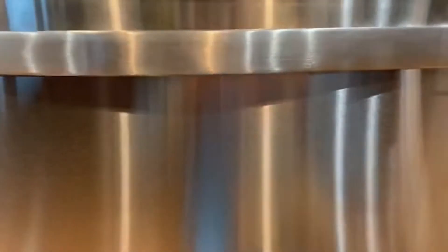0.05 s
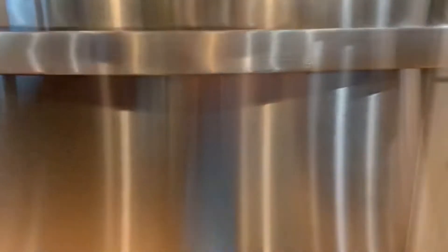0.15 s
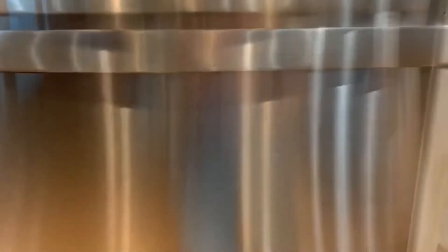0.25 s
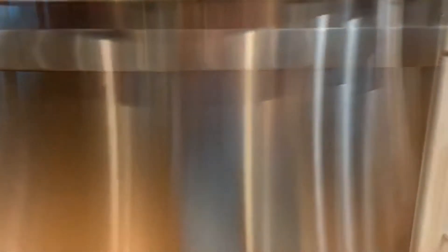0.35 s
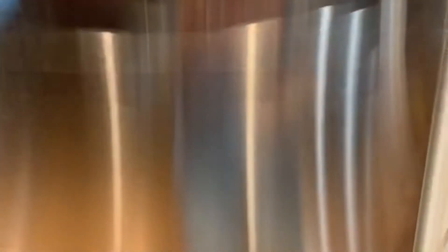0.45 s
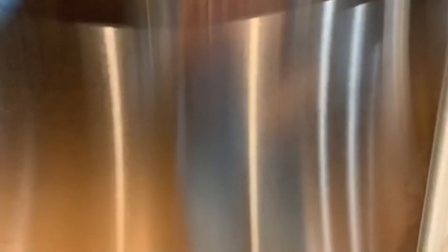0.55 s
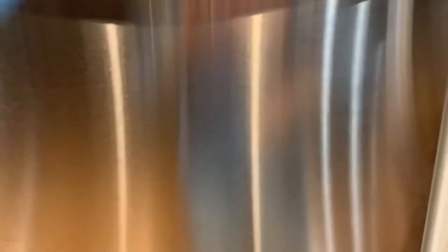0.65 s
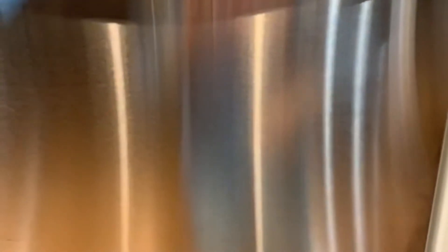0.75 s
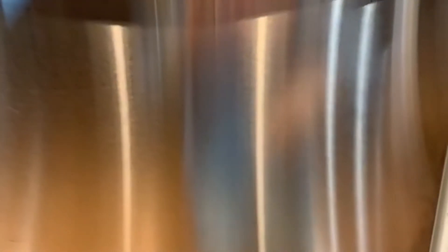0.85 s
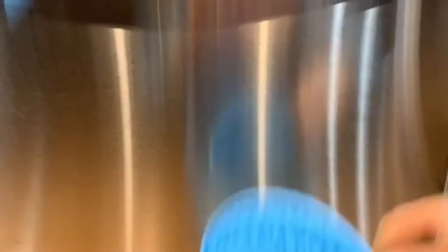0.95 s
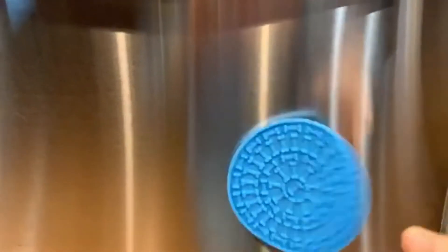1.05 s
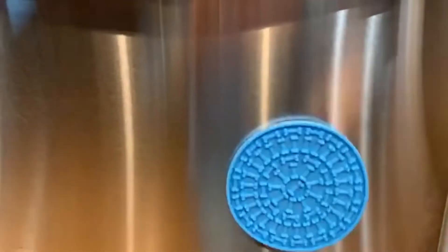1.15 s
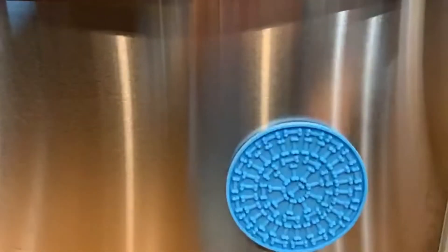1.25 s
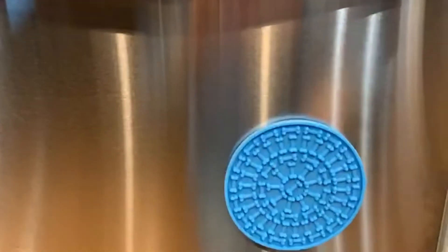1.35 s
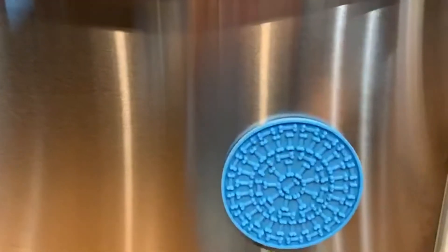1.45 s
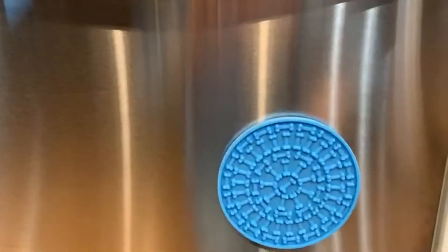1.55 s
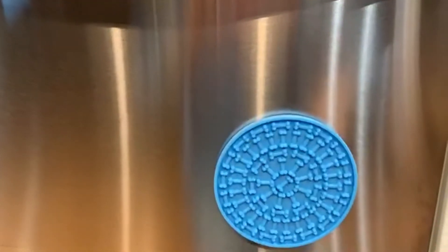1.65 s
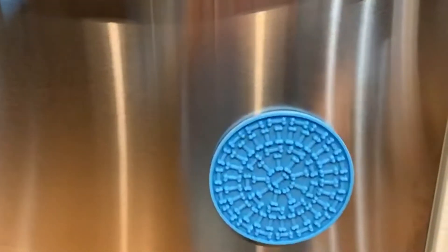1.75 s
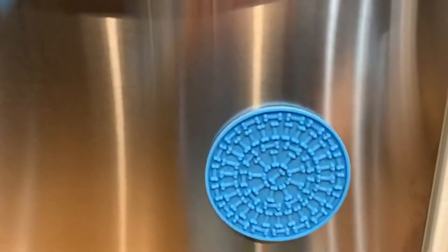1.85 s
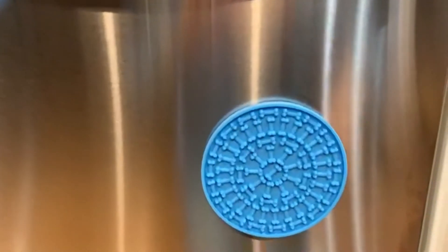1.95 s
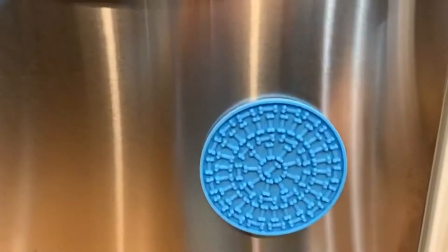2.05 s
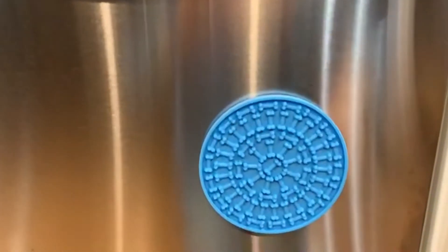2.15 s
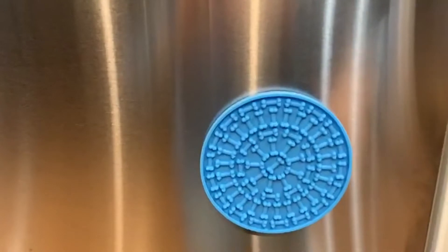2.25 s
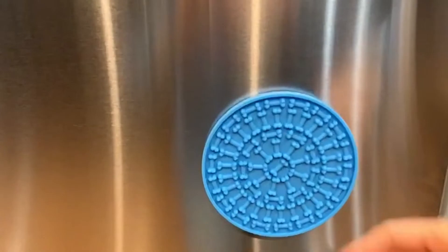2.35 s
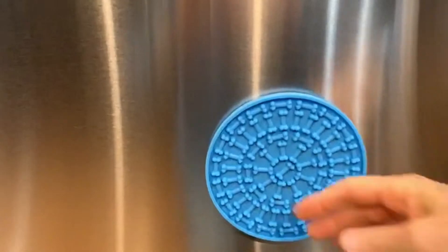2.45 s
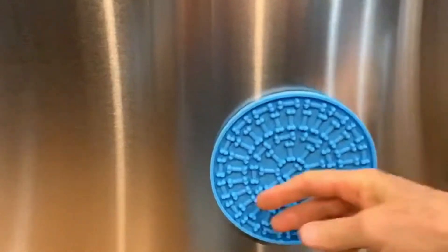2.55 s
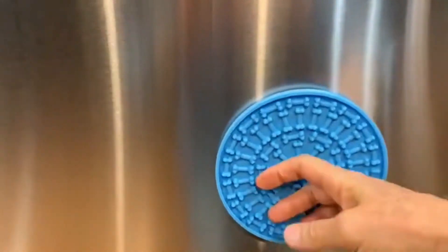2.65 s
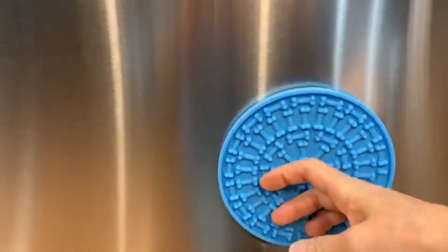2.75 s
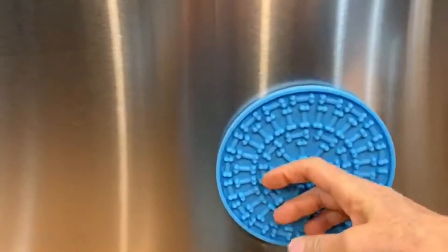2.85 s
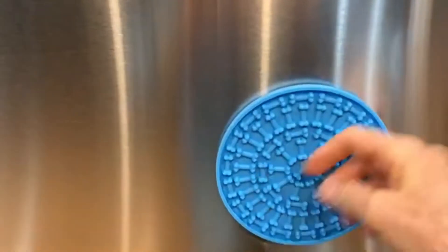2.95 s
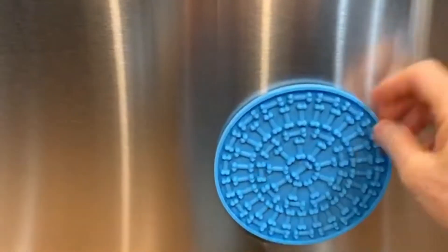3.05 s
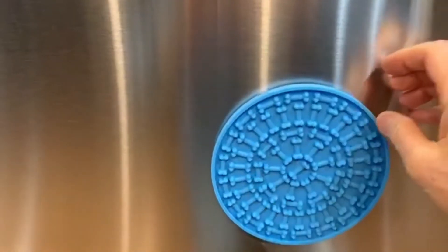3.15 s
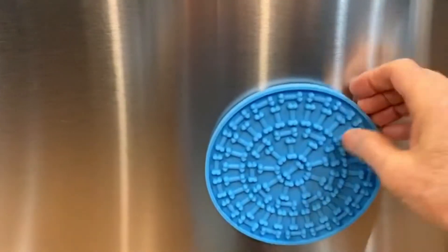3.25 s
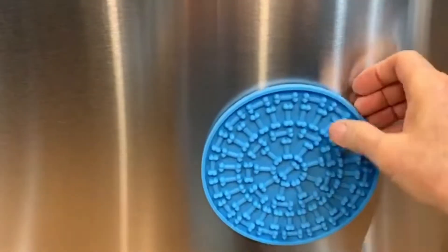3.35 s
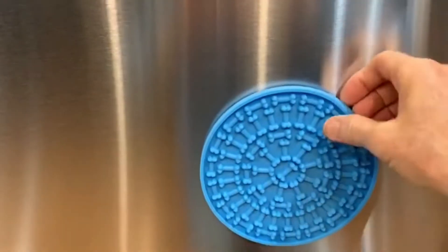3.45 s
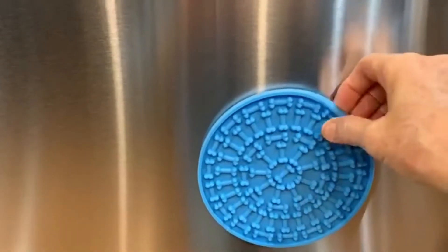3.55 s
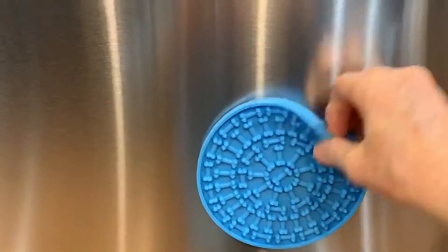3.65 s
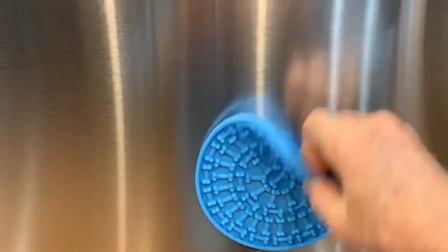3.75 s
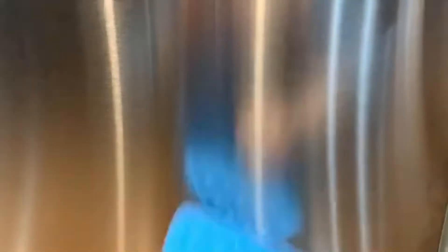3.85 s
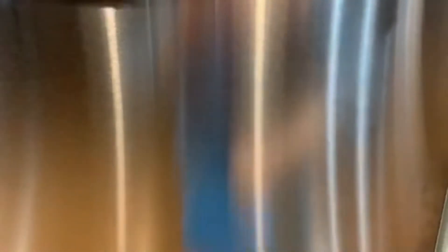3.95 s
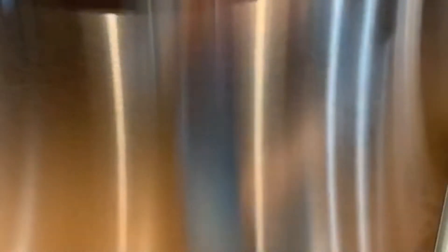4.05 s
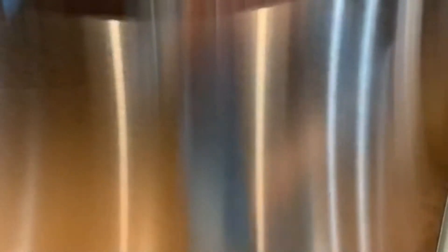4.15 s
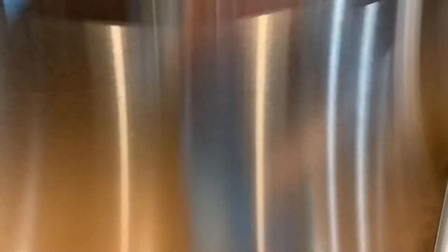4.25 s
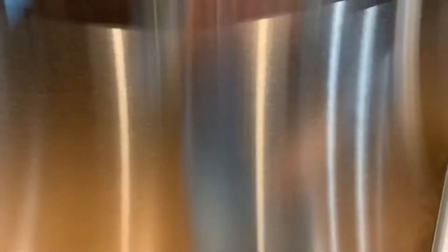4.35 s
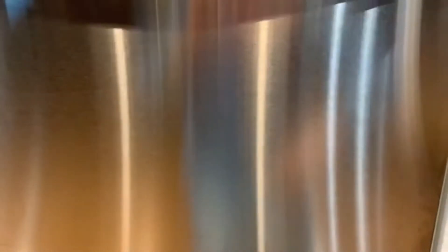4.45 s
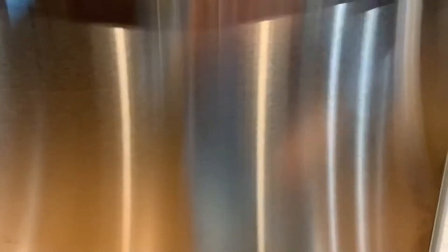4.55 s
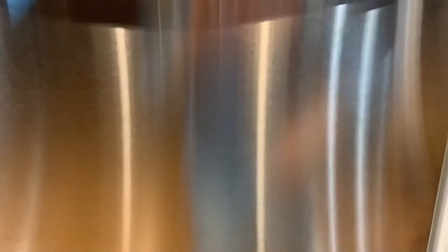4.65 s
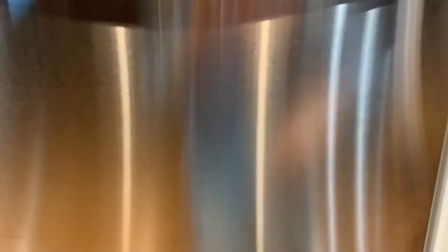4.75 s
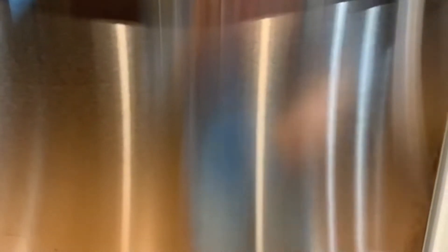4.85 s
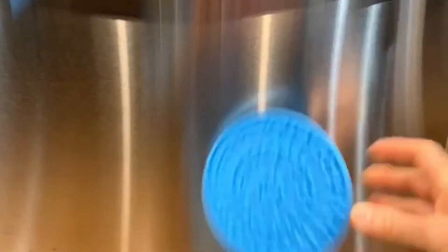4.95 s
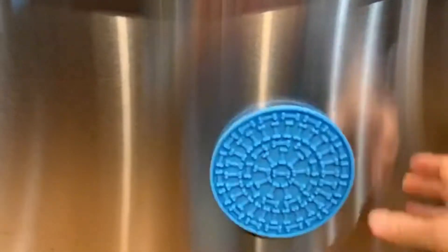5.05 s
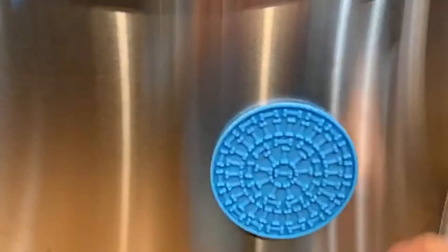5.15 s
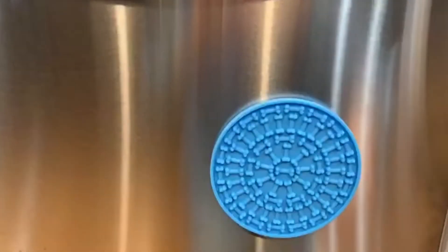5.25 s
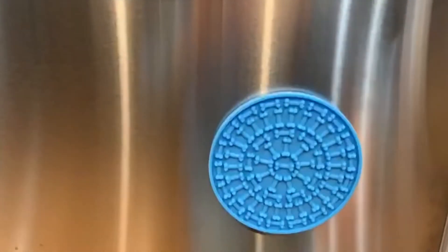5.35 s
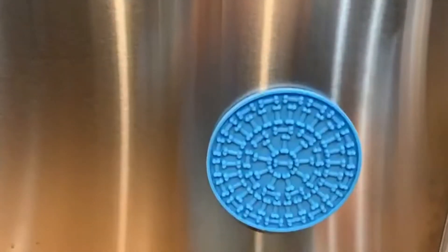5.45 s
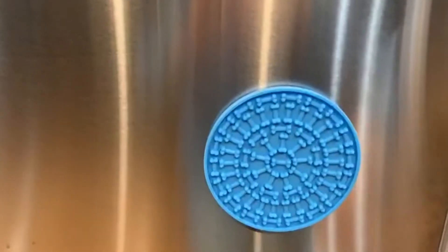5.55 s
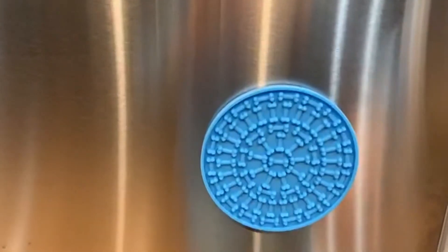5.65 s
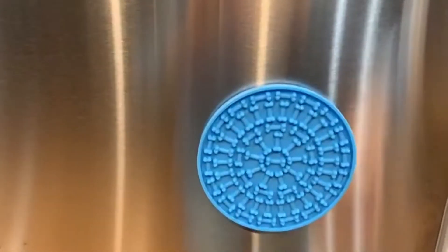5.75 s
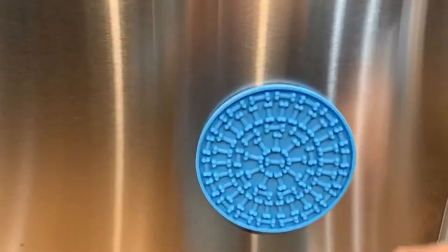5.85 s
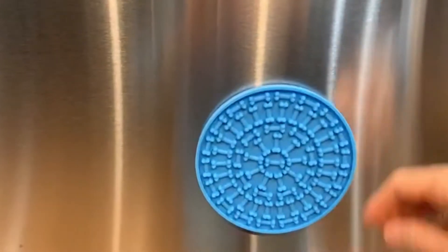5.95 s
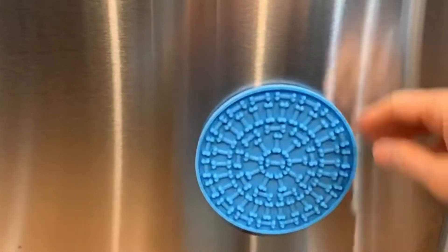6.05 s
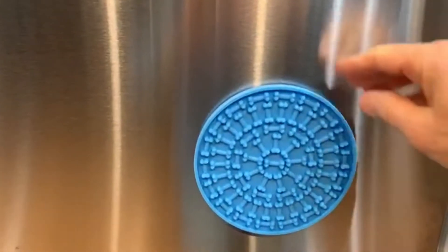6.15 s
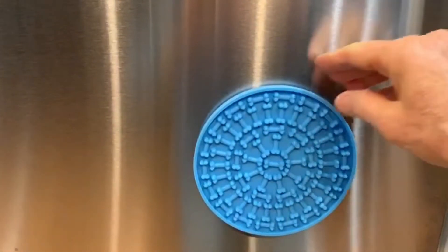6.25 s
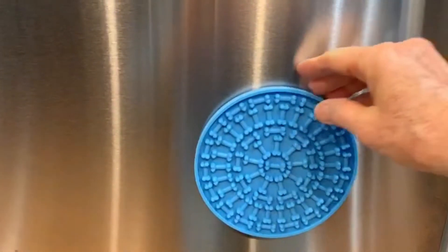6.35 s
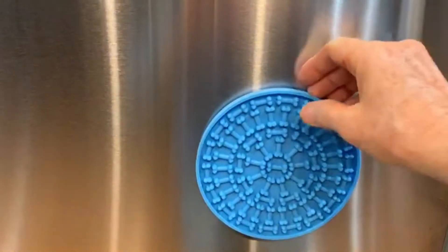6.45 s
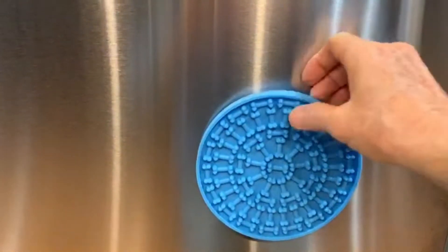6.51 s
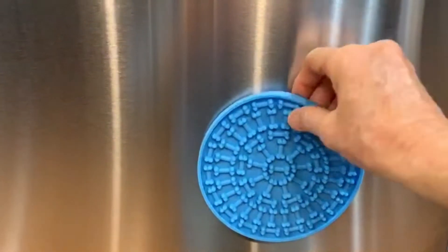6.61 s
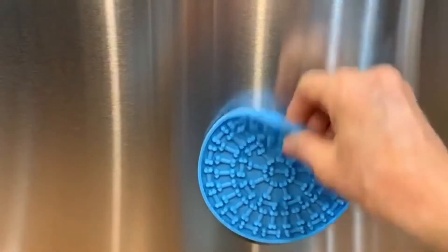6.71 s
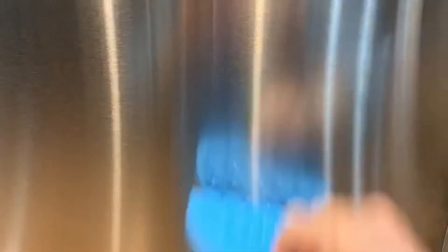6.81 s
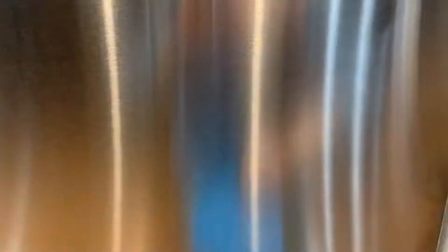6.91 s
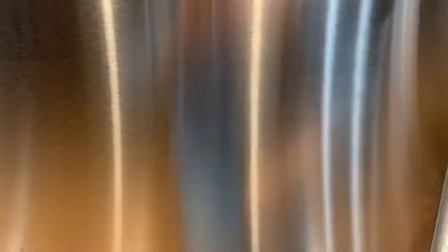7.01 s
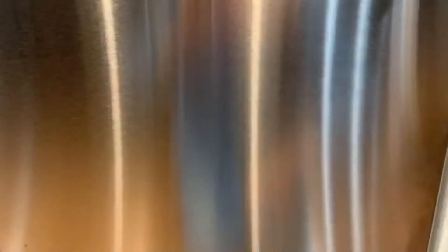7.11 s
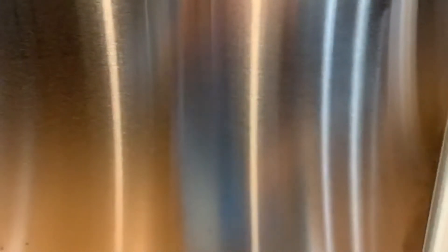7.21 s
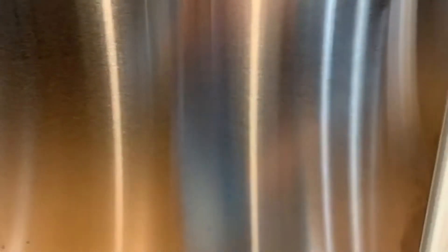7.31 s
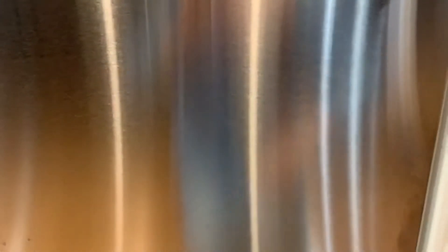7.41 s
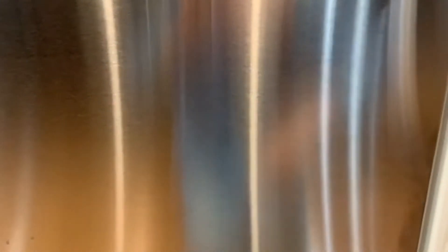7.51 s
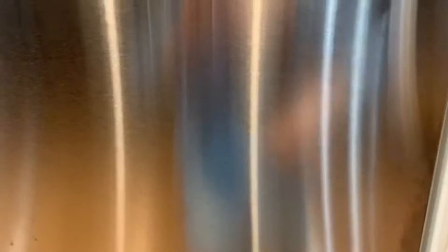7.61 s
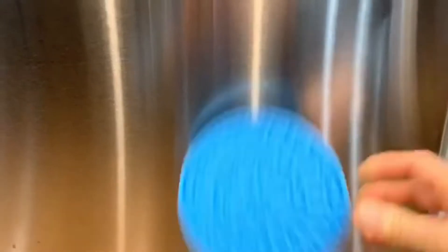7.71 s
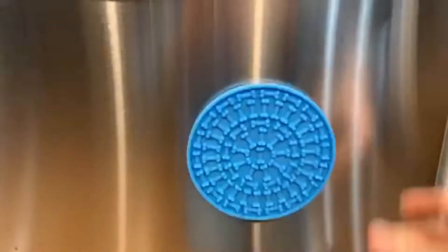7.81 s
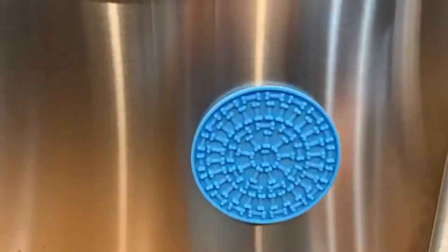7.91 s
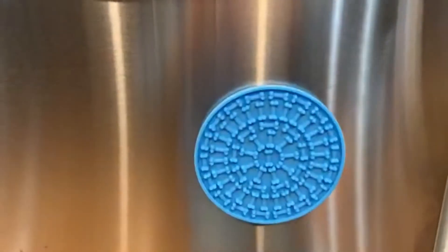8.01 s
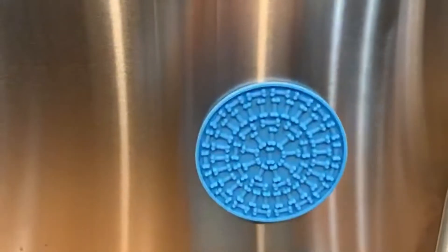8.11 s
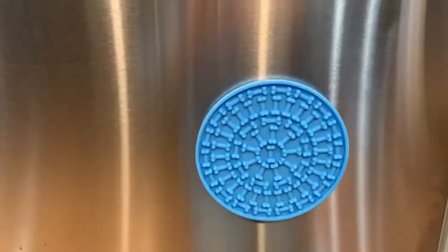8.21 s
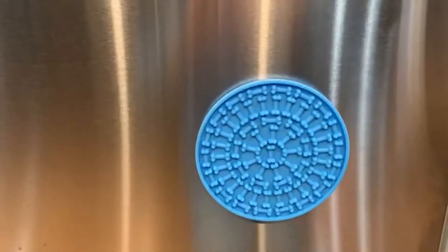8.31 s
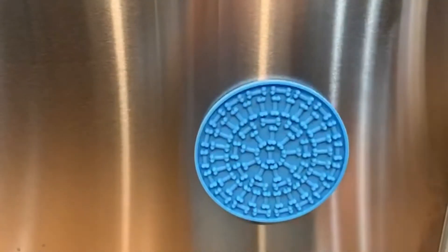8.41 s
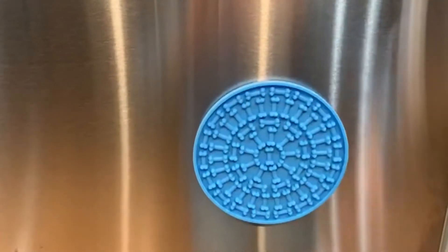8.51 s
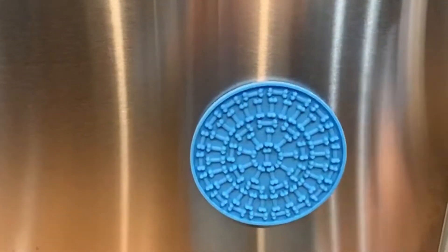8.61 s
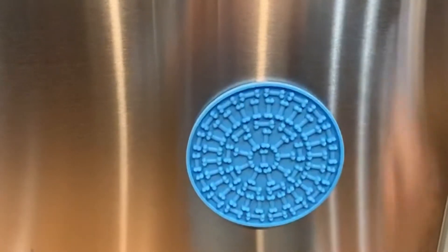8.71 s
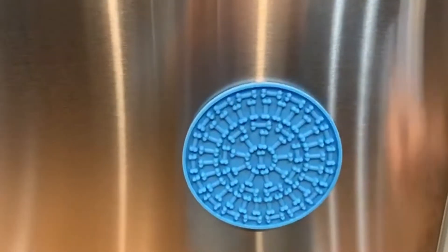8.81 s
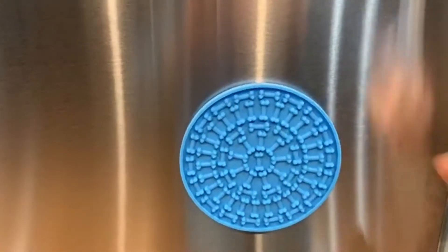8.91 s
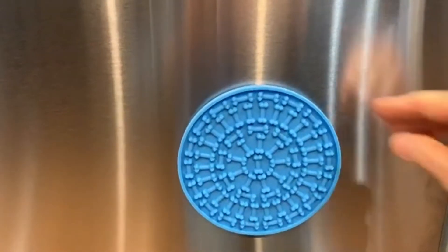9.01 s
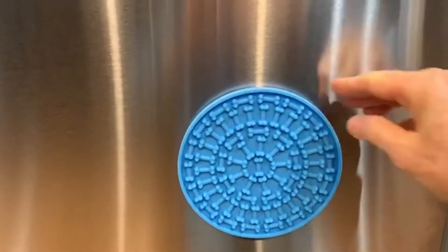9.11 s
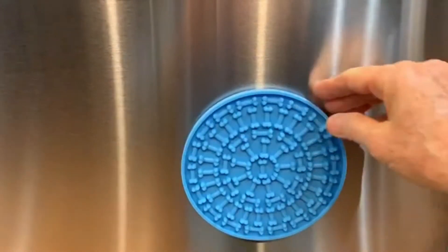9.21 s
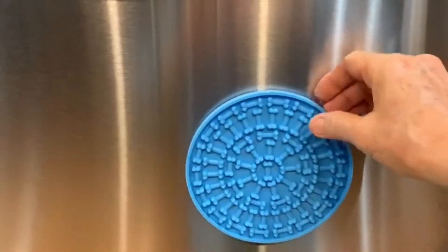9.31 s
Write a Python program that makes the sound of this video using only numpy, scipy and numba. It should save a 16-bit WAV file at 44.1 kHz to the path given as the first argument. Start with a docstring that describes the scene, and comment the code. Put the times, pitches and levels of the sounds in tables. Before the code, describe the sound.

A floppy rubber suction mat smacks loudly onto a hollow metal door three times, with two crackling, popping peels between, in a hard-surfaced kitchen.

```python
"""Suction mat on a steel door

A silicone mat with suction cups is thrown three times at a steel appliance door and peeled off twice.
Blows are gliding rings of trapped air plus a crack or smack; the door booms as a bank of damped modes,
and a hard kitchen answers with banded noise echoes. Rustle, brushing fingers, puffs before landings and
grainy rises before pops are shaped noise over a far wavering drone. The phone's gain control ducks loud
blows, then lets the tail back up."""
import sys
import numpy as np
from scipy import signal
from scipy.fft import rfft, irfft, next_fast_len
from scipy.io import wavfile
from scipy.ndimage import uniform_filter1d, minimum_filter1d
from numba import njit

SR = 44100
rng = np.random.default_rng(int(sys.argv[2]) if len(sys.argv) > 2 else 0)


def unload_wav(signal):
    """Save mono or channel-first audio to the path in sys.argv[1] as 16-bit WAV at rate SR, clipped to [-1, 1]."""
    wavfile.write(
        sys.argv[1],
        SR,
        np.round(np.clip(np.atleast_2d(signal).T, -1, 1) * 32767).astype(np.int16),
    )


N = 413216
t = np.arange(N) / SR

# Far drone pitch. Each row: time in seconds, pitch in Hz.
DRONE_PITCH = [(1.9, 109.9), (2.2, 119), (3.15, 105), (4.1, 113.4), (5, 108.7), (6.1, 107), (7, 112.3),
               (7.7, 116.4), (8.4, 109), (9.37, 105.7)]
# Far drone loudness, before its random flutter. Each row: time in seconds, level in dB.
DRONE_SWELL = [(1.9, -68), (1.95, -50.5), (3.1, -49), (7.8, -50), (8.45, -54), (8.9, -67.5), (9.37, -57)]
# Low rumble dying away. Each row: time in seconds, level in dB.
RUMBLE_FADE = [(0, -51), (.4, -57), (.46, -92)]
# Spectrum of the quiet kitchen. Each row: frequency in Hz, relative level in dB per Hz.
QUIET_COLOUR = [(30, -21), (75, -16), (109, -9), (184, -15.5), (740, -29.5), (1670, -35), (2900, -38),
                (16000, -48)]
QUIET_DB = -55.5

# The mat flexes in the hand. Each row: centre in seconds, half length in seconds, level in dB.
RUSTLES = [(0.362, 0.05, -52), (0.546, 0.099, -55), (0.855, 0.057, -51.5), (3.139, .02, -47.5),
           (3.2, 0.02, -47), (3.301, 0.049, -50.5), (3.474, 0.096, -59), (7.741, 0.025, -54)]
# A brief soft puff of noise just before each landing.
PUFF_AHEAD_S, PUFF_HALF_S, PUFF_DB = 0.0081, 0.0087, -35

# Small dry ticks. Each row: start in seconds, strength in dB, ring in Hz, crack over the usual in dB.
TICKS = [(.4435, -48.5, 4400, 5), (.829, -39, 1105, -16), (2.9797, -35.5, 1650, -6),
         (3.0745, -49, 4600, 16.5), (5.5267, -40, 2460, -18), (5.545, -41.5, 1680, -15),
         (6.680, -29, 1702, -15), (7.7088, -48.5, 1610, 11), (8.577, -50, 1602, -6)]
# Fingertips bump the door, soft knocks nearby. Each row: start in seconds, strength in dB.
THUMPS = [(.492, -23), (.829, -31), (1.6857, -34), (2.484, -33), (2.8999, -26.5), (2.985, -22.5),
          (3.1339, -21.5), (3.147, -18.5), (3.162, -23), (3.1828, -13), (3.2022, -16.5), (3.3309, -26),
          (3.4387, -30), (3.5809, -24), (6.3693, -7), (9.2473, -5.5)]
# The thrown mat's edge lands. Each row: start in seconds, strength in dB.
LANDINGS = [(1.109, 10), (5.064, 9.5), (7.816, 9)]
# Cups seal as the mat folds flat. Each row: start in seconds, strength in dB, ring in Hz,
# crack over the usual in dB.
SEALS = [(1.1165, 13, 1237, -9.5), (1.148, -14.5, 1030, 15), (1.177, 13, 1190, -3.5),
         (1.1915, 1.5, 1590, -7), (1.2595, -8.5, 2480, -1.5), (5.1165, 21, 1289, 1.5),
         (5.133, 5.5, 1690, -8), (7.8195, 18, 1010, -3.5), (7.8605, 20.5, 1295, 3)]
# Pressed cups squeak. Each row: start in seconds, strength in dB, ring in Hz.
SQUEAKS = [(2.6879, -20, 1668), (2.699, -12, 1640), (2.705, -5, 1650), (2.713, -14, 1400),
           (2.720, -10, 1800), (2.728, -9, 2560), (2.736, -7, 1625)]
# A fingertip plucks the rim. Each row: start in seconds, strength in dB, ring in Hz,
# crack over the usual in dB.
PLUCKS = [(3.6494, -17, 1620, -18), (6.6447, 3, 2326, 5.5), (6.772, -9.5, 1664, -3.5)]
# Cups tear loose. Each row: start in seconds, air ring in dB, crack in dB, ring in Hz.
POPS = [(3.702, 10, 9.5, 2740), (3.705, 9, 7.5, 1990), (3.7946, 2, 9, 2470), (3.8297, 2, 9, 2330),
        (3.855, 5, 8, 1640), (3.8662, -0.7, 16.5, 1820), (3.8785, -4.5, 4, 1590), (3.8843, 0, 3, 2200),
        (3.8872, -2, 6, 2300), (3.9008, 9.5, 19, 2000), (3.905, 0, 10, 1900), (3.9114, 5.5, 4, 2775),
        (3.918, 6, -13, 1980), (3.9227, 13, 1.5, 2634), (3.9325, 3, 7, 2280), (3.9379, 2, 9, 2100),
        (3.9484, 5, 21, 2300), (6.875, -33, -28, 3500), (6.8858, -4, 17.5, 2087), (6.898, -2.5, -7.5, 1500),
        (6.9076, -2.5, 5.5, 2563), (6.9243, 8.5, 8.5, 2320)]

# The rule for each kind of blow. Each tuple: start pitch excess as a ratio, ring t60 in seconds,
# then ring, crack and door in dB over the strength, left minus right in dB, higher rings in dB,
# rings towards the walls in dB.
TICK = (-0.1, .015, 1.5, -4, -12, 1, -5, -4)
THUMP = (0.46, 0.08, -21.5, -36, 5, 2, -6, 0.2)
LANDING = (2.5, 0.05, 0, -25, -8, 1.5, -12, 0.1)
SEAL = (0.0952, .015, 0.26, -16, -6.5, 3, -10, -2)
SQUEAK = (0.16, .03, 4, -20, -4, 4, -4, -6)
PLUCK = (0.09, .013, -0.3, -15, -6, 1.7, -9, -9)
THUMP_HZ, LANDING_HZ = 800, 510
POP_DROP, POP_T60_S, POP_DOOR_DB, POP_PAN_DB = 0.075, .008, -5, 0.8
POP_CRACK_SHARE, POP_UPPER_DB = 0.62, -9

# Higher rings of the air under the mat, before scatter. Each row: frequency in Hz, relative level in dB.
UPPER_RINGS = [(1660, -6), (2580, -6), (3450, -12)]
UPPER_SCATTER_DB, UPPER_SCATTER = 3.5, .03  # spread of level, and of pitch as a ratio
# The rubber keeps moving: spread of the pitch as a ratio, seconds it holds.
WOBBLE, WOBBLE_S = .035, .0015
# Rubber meeting steel. Each row: frequency in Hz, relative level in dB per Hz.
SMACK_COLOUR = [(250, -11.5), (700, -6.5), (2200, -5.5), (4500, -17), (7500, -13), (12500, -22)]
# A cup cracking open, also the ticks. Each row: frequency in Hz, relative level in dB per Hz.
CRACK_COLOUR = [(600, -12), (1500, -4), (2800, -4), (5000, -10), (8300, -2.5), (10500, -2.5), (12300, -9),
                (14000, -32)]

# Modes of the steel door. Each row: frequency in Hz, relative level in dB, t60 in seconds.
DOOR_MODES = [(70, -21, .17), (117.8, -16, 0.22), (171.6, -3, 0.18), (211.3, -2, .12), (256, -1.5, 0.16),
              (302.3, 3.5, 0.074), (366, -0.45, 0.093), (433.6, -1.5, 0.091), (580, -7, 0.1),
              (690, -9, 0.12), (900, -10, .05)]
DOOR_SCATTER_DB, DOOR_SCATTER_RAD = 2.5, .6
# Kitchen echoes by band. Each row: band centre in Hz, t60 in seconds, relative level in dB.
KITCHEN_BANDS = [(59, 0.64, -16), (200, .5, -9.5), (560, 0.55, -5.5), (1431, 0.65, -13.5), (3840, 0.57, -5),
                 (8500, 0.44, -8), (12400, 0.35, -9)]
KITCHEN_DB, KITCHEN_RISE_S = -34.5, .016

# Soft grainy noise that rises before a pop and stops at it. Each row: end in seconds,
# growth time in seconds, level in dB.
RISES = [(3.702, .004, -22), (6.885, .014, -30.5)]
# Fingertips slide over steel. Each row: start in seconds, level in dB before rise and fade.
BRUSHES = [(6.372, -34), (9.244, -35)]
# The brush sags from the start; the extra fade sets in after the hold (both in dB per second).
BRUSH_RISE_S, BRUSH_HOLD_S, BRUSH_SAG_DB_S, BRUSH_FADE_DB_S = 0.0068, 0.14, 51, 119

ALIKE_HZ = 455  # below this both microphone ports hear the same
PORT_LAG_S = .00002  # the left port hears the direct blows a little later
BASS_CUT_HZ, TOP_HZ = 44, 16300
LOUD_DB, LOUD_S, LOUD_RELEASE_S = -6, 0.0024, 0.041  # gain control: ceiling, averaging, release
CEILING_DB, RELEASE_S = -.3, 0.0054  # peak limiter
LOOK_S = 0.00063  # look-ahead of both


def undb(db):
    """Turn dB into an amplitude factor."""
    return 10 ** (np.asarray(db) / 20)


def colour(x, table):
    """Shape a spectrum by (Hz, dB) points joined on a log frequency axis."""
    n = next_fast_len(x.shape[-1])
    hz, db = np.transpose(table)
    bins_hz = np.arange(n // 2 + 1) * SR / n
    gain = undb(np.interp(np.log(bins_hz + 1), np.log(hz), db))
    return irfft(rfft(x, n) * gain, n)[..., :x.shape[-1]]


def unit(x):
    """Scale to an RMS of 1."""
    return x / np.sqrt(np.mean(x ** 2))


def curve(table, off=-120):
    """Join (s, value) points by lines, with the off value outside them."""
    times, values = np.transpose(table)
    return np.interp(t, times, values, off, off)


def ports(n):
    """Two-channel noise, alike in the bass and unrelated in the treble."""
    mid, side = rng.standard_normal((2, n))
    side = signal.sosfilt(signal.butter(2, ALIKE_HZ, "high", fs=SR, output="sos"), side)
    return np.array([mid + side, mid - side]) / np.sqrt(2)


def walk(rate):
    """Random levels, one every 1 / rate seconds, slewed together; spread just under 1."""
    k = int(SR / rate)
    steps = np.repeat(rng.standard_normal(N // k + 1), k)
    return uniform_filter1d(steps, k)[:N]


def background():
    """A wavering drone with tones at half and one and a half its pitch, a fading rumble, the quiet kitchen."""
    phase = 2 * np.pi * np.cumsum(curve(DRONE_PITCH, off=110)) / SR
    drone = np.sin(phase) + undb(-22) * np.sin(phase / 2) + undb(-18.0) * np.sin(3 * phase / 2)
    drone = np.sqrt(2) * drone * undb(curve(DRONE_SWELL) + 3.0 * walk(16))
    low_noise = colour(rng.standard_normal(N), [(40, -38.0), (70, -8), (85, 2.5), (130, -28), (1000, -61.5)])
    rumble = unit(low_noise) * undb(curve(RUMBLE_FADE))
    quiet = unit(colour(ports(N), QUIET_COLOUR)) * undb(QUIET_DB + 0.5 * walk(2.7))
    return drone + rumble + quiet


def rustle_and_puffs():
    """Rubber flexing and a soft puff before each landing: uneven grains under bell-shaped swells."""
    grain = ports(N) * undb(4 * walk(300))
    soft = unit(colour(grain, [(200, -11), (600, 6.0), (2600, -2), (6000, -20)]))
    puffs = [(s - PUFF_AHEAD_S, PUFF_HALF_S, PUFF_DB) for s, _ in LANDINGS]
    swells = [undb(db) * np.exp(-((t - s) / half) ** 2) for s, half, db in RUSTLES + puffs]
    return soft * sum(swells)


def alike(table, kind, shared_hz=None):
    """Spell out each event as a row for blows() and door(), by the rule of its kind."""
    drop, t60, ring_db, crack_db, door_db, *rest = kind
    rows = []
    for s, db, *own in table:
        hz = shared_hz or own[0]
        extra_crack_db = sum(own[1:])  # 0 where the table has no such column
        rows.append((s, db + ring_db, hz, drop, t60, db + crack_db + extra_crack_db, db + door_db, *rest))
    return rows


def hiss_and_snap(count, u, voice, crack_s):
    """Cracks for left, right and walls: a short coloured hiss with a snap at its peak."""
    hiss = rng.standard_normal((count, len(u))) * u / crack_s * np.exp(1 - u / crack_s)
    peak = int(crack_s * SR)
    hiss[:, peak] += 3.0
    # summed over all directions the hiss has a smooth spectrum: the walls get one snap of the same energy
    snap = np.linalg.norm(hiss, axis=1)[:, None] * np.eye(1, len(u), peak)
    cracks = colour(np.stack([hiss, hiss, snap], axis=1), voice)
    click = colour(np.eye(1, len(u)), voice)
    cracks = cracks / np.sqrt(np.mean(click ** 2) * len(u))  # the colour adds no energy
    return cracks * np.cos(np.pi / 2 * u / u[-1])  # no crack is left at the end of a blow


def higher_rings(wobbles):
    """Upper resonances of the trapped air, sharing the wobble of the lowest."""
    hz, db = np.transpose(UPPER_RINGS)
    # the mat never lies the same way twice
    fold = rng.standard_normal((len(wobbles), 2, len(hz), 1))
    level = undb(db[:, None] + UPPER_SCATTER_DB * fold[:, 0])
    pitch = hz[:, None] * (1 + UPPER_SCATTER * fold[:, 1])
    phase = 2 * np.pi * pitch * np.cumsum(wobbles, axis=1)[:, None] / SR
    return np.sum(level * np.sin(phase), axis=1)


def blows(table, voice, crack_s, swell_s):
    """Each blow: rings of trapped air, the lowest gliding to its pitch, and a snap with a short hiss."""
    air = np.zeros((3, N + SR))  # left, right, towards the walls
    u = np.arange(SR // 12) / SR
    cracks = hiss_and_snap(len(table), u, voice, crack_s)
    hold = int(WOBBLE_S * SR)
    drift = uniform_filter1d(rng.standard_normal((len(table), len(u))), hold)
    wobbles = 1 + WOBBLE * np.sqrt(hold) * drift
    highs = higher_rings(wobbles)
    for crack, high, wobble, row in zip(cracks, highs, wobbles, table):
        s, ring_db, hz, drop, t60, crack_db, _, pan_db, upper_db, walls_db = row
        glide_hz = hz * wobble * (1 + drop * np.exp(-u / 0.0018))
        low = np.sin(2 * np.pi * np.cumsum(glide_hz) / SR)
        fade = np.exp(-np.log(1000) * u / t60) * (1 - np.exp(-u / swell_s)) ** 2
        ring = undb(ring_db) * fade * (low + undb(upper_db) * high)
        ring = ring * undb([[0], [0], [walls_db]])
        pan = undb(np.array([[pan_db / 2], [-pan_db / 2], [0]]))
        i = int(s * SR)
        air[:, i:i + len(u)] += (ring + undb(crack_db) * crack) * pan
    return air[:, :N]


def door(table, push_s, rise_s):
    """Door modes swell and ring after a push; each spot mixes them anew, a soft push wakes only the low ones."""
    u = t[:SR // 4]
    hz, db, t60 = np.transpose(DOOR_MODES)
    modes = np.exp((2j * np.pi * hz[:, None] - np.log(1000) / t60[:, None]) * u)
    modes = modes * (1 - np.exp(-u / rise_s))
    spot = rng.standard_normal((len(table), 2, len(hz)))
    lag = 1.3 * np.arange(len(hz)) + DOOR_SCATTER_RAD * spot[:, 0]
    level = undb(db + DOOR_SCATTER_DB * spot[:, 1])
    push = 1 / (1 + 2j * np.pi * hz * push_s) ** 2  # a longer push loses the treble
    rings = (level * np.exp(-1j * lag) * push @ modes).imag
    out = np.zeros(N + SR)
    for ring, row in zip(rings, table):
        i, door_db = int(row[0] * SR), row[6]
        out[i:i + len(u)] += 0.27 * undb(door_db) * ring
    return out[:N]


def kitchen(x):
    """Dense echoes that build up quickly and fade band by band."""
    u = t[:SR]
    hz, t60, db = np.transpose(KITCHEN_BANDS)
    noise, echoes = rfft(ports(SR)), 0
    pitch = np.log(np.arange(SR // 2 + 1) + 1.)
    for k in range(len(hz)):
        share = np.interp(pitch, np.log(hz), np.arange(len(hz)) == k)  # neighbouring shares add up to one
        band = irfft(noise * share, SR)
        echoes = echoes + undb(db[k]) * band * np.exp(-np.log(1000) * u / t60[k])
    echoes = echoes * (1 - np.exp(-u / KITCHEN_RISE_S))
    return undb(KITCHEN_DB) * signal.fftconvolve(x[None], echoes, axes=1)[:, :N]


def rises():
    """Soft grainy noise that rises exponentially before a pop and stops at it."""
    grain = ports(N) * undb(4 * walk(900))
    soft = unit(colour(grain, [(900, -20), (2500, 0.3), (7000, -9.5), (10000, -30.5)]))
    swells = [undb(db) * np.exp(np.minimum(t - s, 0) / grow) * (t < s) for s, grow, db in RISES]
    return soft * sum(swells)


def pops():
    """Rows for cups tearing loose: each pulls on the door by a blend of its ring and its crack."""
    rows = []
    for s, ring_db, crack_db, hz in POPS:
        door_db = ring_db + POP_CRACK_SHARE * (crack_db - ring_db) + POP_DOOR_DB
        rows.append((s, ring_db, hz, POP_DROP, POP_T60_S, crack_db, door_db, POP_PAN_DB, POP_UPPER_DB, 0))
    return rows


def brush():
    """Skin slipping on steel: a grainy broad hiss."""
    grain = ports(N) * undb(2.3 * walk(300))
    skin = unit(colour(grain, [(300, 20.0), (2500, 5.5), (6000, -9.5), (15000, -11)]))
    level = np.zeros(N)
    for s, db in BRUSHES:
        u = np.maximum(t - s, 0)
        fade_db = BRUSH_SAG_DB_S * u + BRUSH_FADE_DB_S * np.maximum(u - BRUSH_HOLD_S, 0)
        level += undb(db - fade_db) * (1 - np.exp(-u / BRUSH_RISE_S))
    return skin * level


def scene():
    """Sum the blows, the door and its kitchen echoes, the soft noises and the background."""
    ticks, thumps = alike(TICKS, TICK), alike(THUMPS, THUMP, THUMP_HZ)
    throws = alike(LANDINGS, LANDING, LANDING_HZ) + alike(SEALS, SEAL)
    squeaks = alike(SQUEAKS, SQUEAK)
    peels = pops() + alike(PLUCKS, PLUCK)
    # blows, colour of the crack, crack s, swell of the ring s, push s, swell of the door s
    kinds = ((ticks, CRACK_COLOUR, .0012, .0005, .0005, .003),
             (thumps, SMACK_COLOUR, .003, .0004, .0008, .004),
             (throws, SMACK_COLOUR, .003, .0003, 0.00033, .0013),
             (squeaks, SMACK_COLOUR, .003, .0012, .0004, .002),
             (peels, CRACK_COLOUR, .0006, .0002, 0.00028, .006))
    air = sum(blows(table, voice, crack_s, swell_s) for table, voice, crack_s, swell_s, *_ in kinds)
    boom = sum(door(table, push_s, rise_s) for table, *_, push_s, rise_s in kinds)
    near = air[:2] + boom * undb([[.8], [-.8]])
    echoes = kitchen(air[2] + boom)
    n = next_fast_len(N)
    delay = np.exp(-2j * np.pi * np.arange(n // 2 + 1) * SR / n * PORT_LAG_S)
    late_left = irfft(rfft(near[0], n) * delay, n)[:N]
    direct = np.array([late_left, near[1]])
    return direct + echoes + brush() + rustle_and_puffs() + rises() + background()


@njit
def recover(need, rate):
    """Gain drops at once and creeps back."""
    g, out = 1., np.empty(len(need))
    for i in range(len(need)):
        g = need[i] if need[i] < g else g + rate * (need[i] - g)
        out[i] = g
    return out


def duck(size, top_db, release_s):
    """Gain that holds a running size down to a ceiling, acting a little ahead of time."""
    look = int(LOOK_S * SR)
    need = np.minimum(1, undb(top_db) / (size + 1e-9))
    need = minimum_filter1d(need, 2 * look + 1)
    return uniform_filter1d(recover(need, 1 / (release_s * SR)), look)


def record(dry):
    """The microphone drops the deep bass; gain control follows loudness, a limiter catches peaks; the top is cut."""
    heard = signal.sosfilt(signal.butter(2, BASS_CUT_HZ, "high", fs=SR, output="sos"), dry)
    power = uniform_filter1d(np.mean(heard ** 2, axis=0), int(LOUD_S * SR))
    loudness = np.sqrt(np.abs(power))
    heard = heard * duck(loudness, LOUD_DB, LOUD_RELEASE_S)
    peaks = np.abs(heard).max(axis=0)
    heard = heard * duck(peaks, CEILING_DB, RELEASE_S)
    return signal.sosfilt(signal.ellip(8, .2, 70, TOP_HZ, fs=SR, output="sos"), heard)


dry = scene()
out = record(dry)
unload_wav(out)
```